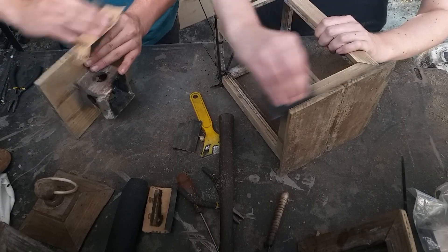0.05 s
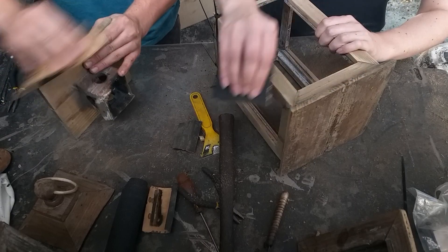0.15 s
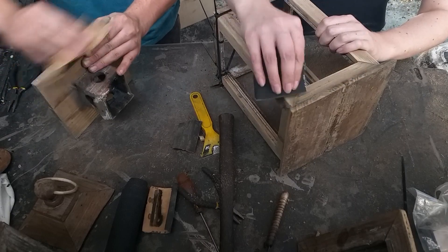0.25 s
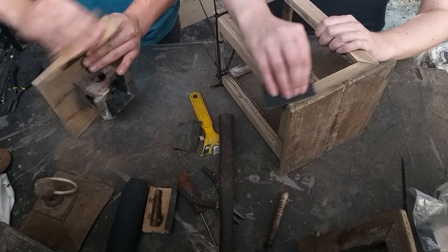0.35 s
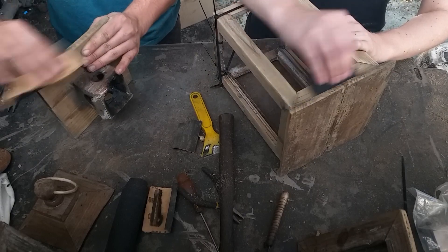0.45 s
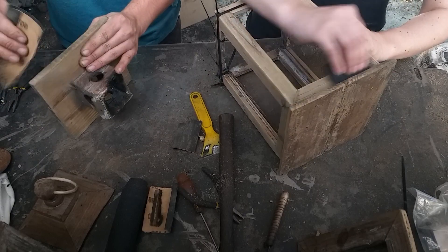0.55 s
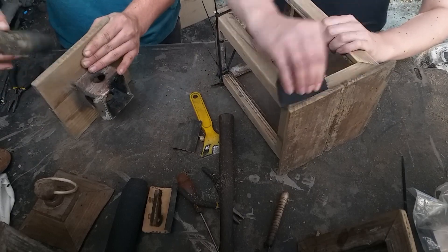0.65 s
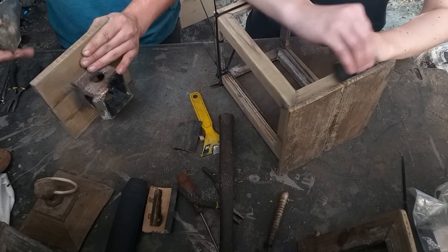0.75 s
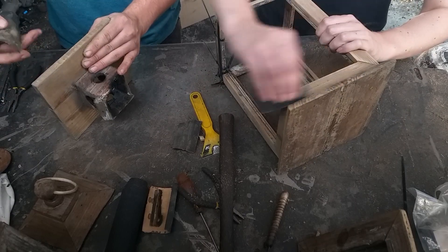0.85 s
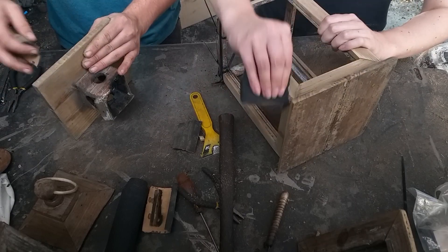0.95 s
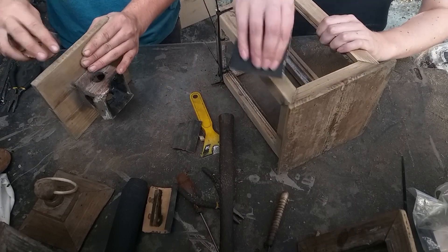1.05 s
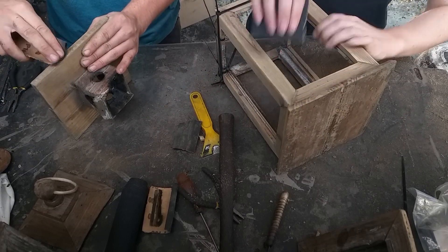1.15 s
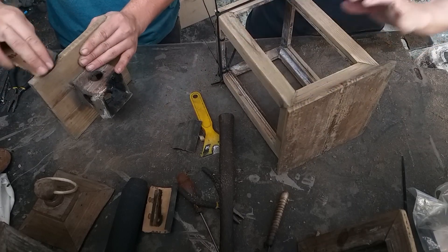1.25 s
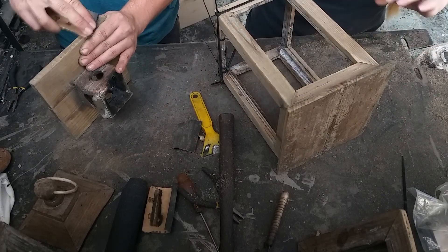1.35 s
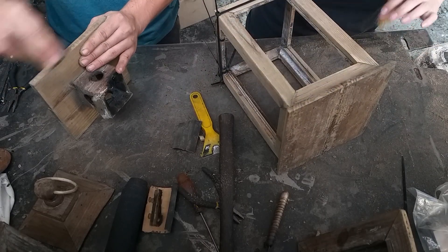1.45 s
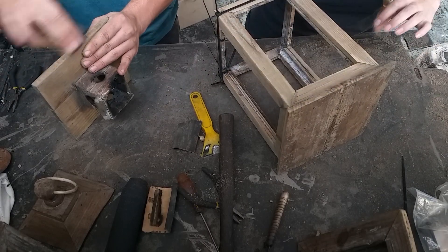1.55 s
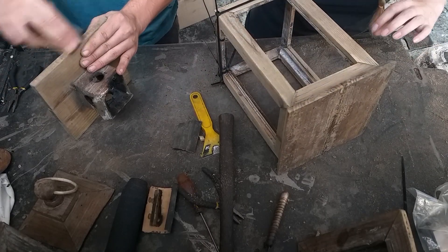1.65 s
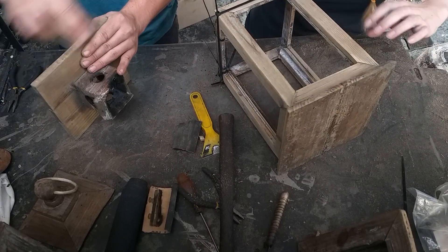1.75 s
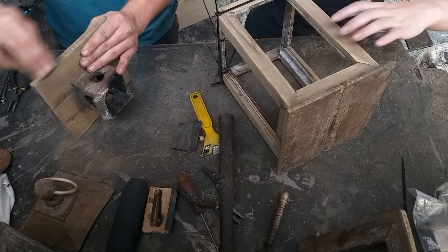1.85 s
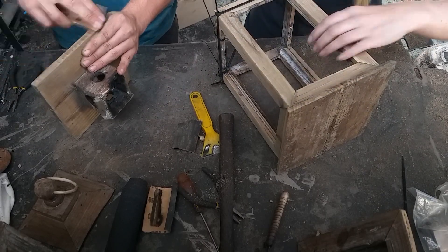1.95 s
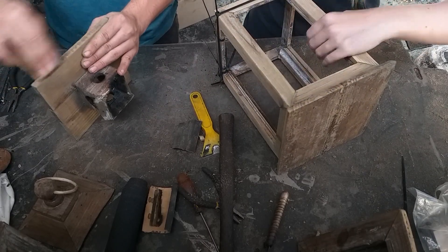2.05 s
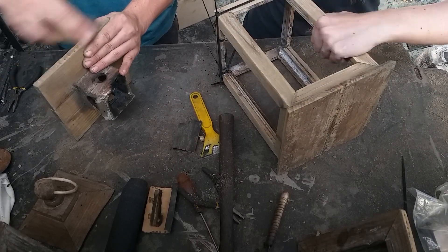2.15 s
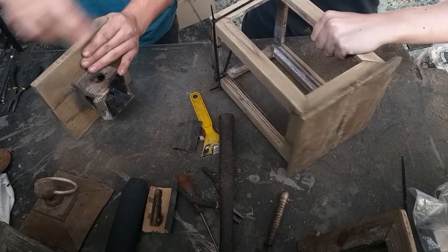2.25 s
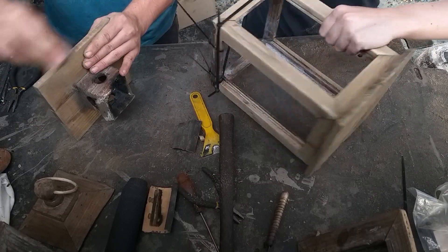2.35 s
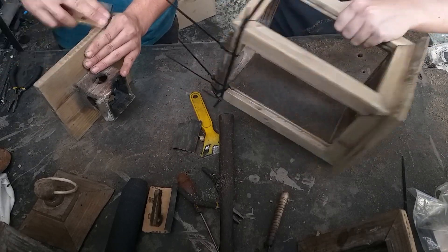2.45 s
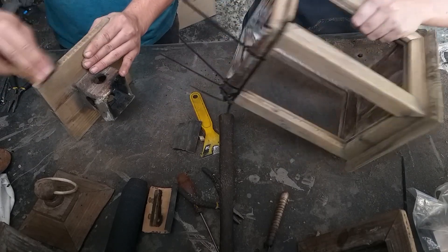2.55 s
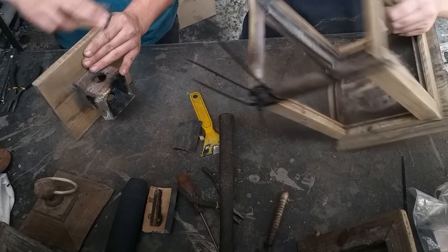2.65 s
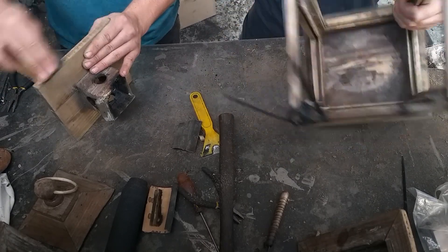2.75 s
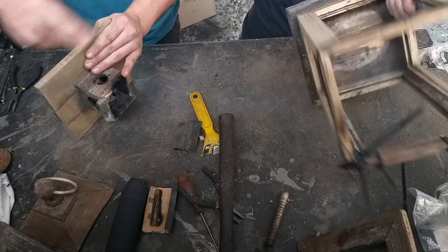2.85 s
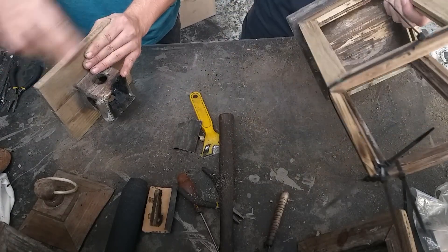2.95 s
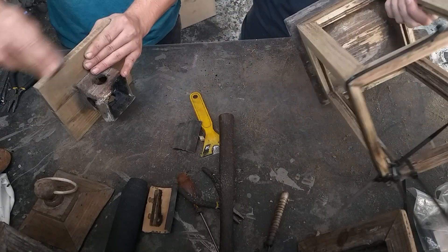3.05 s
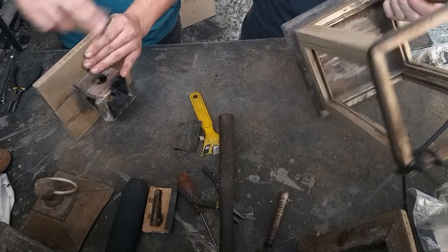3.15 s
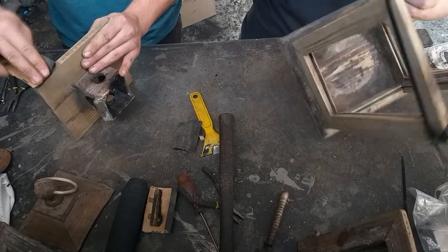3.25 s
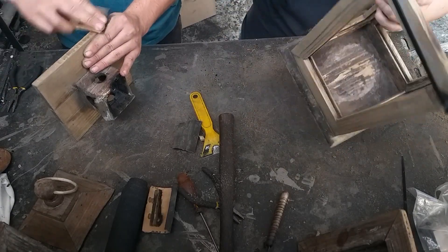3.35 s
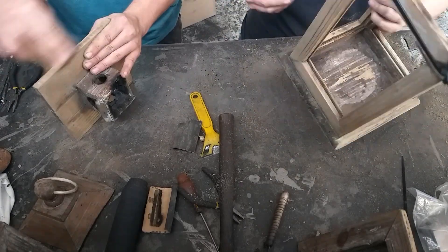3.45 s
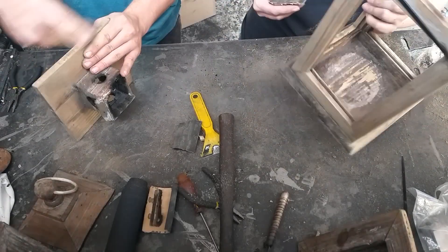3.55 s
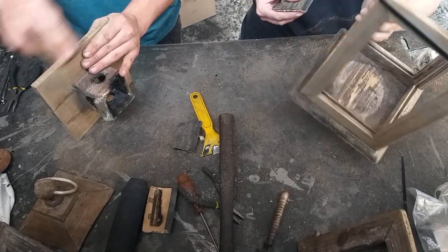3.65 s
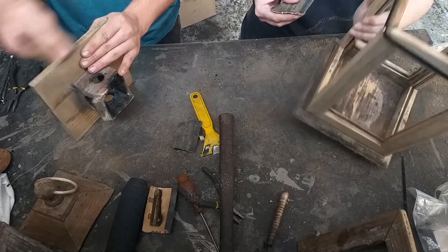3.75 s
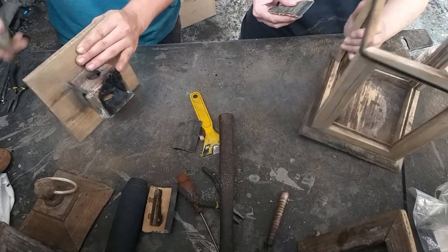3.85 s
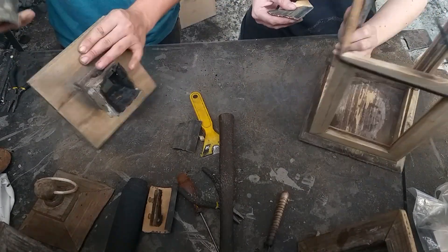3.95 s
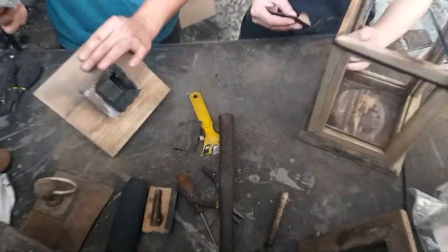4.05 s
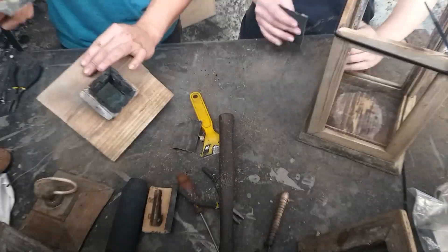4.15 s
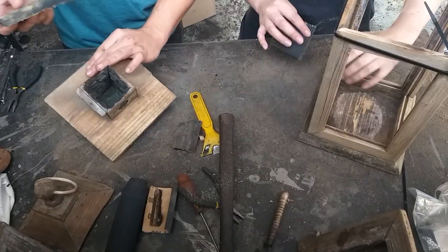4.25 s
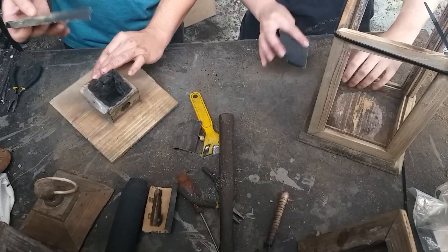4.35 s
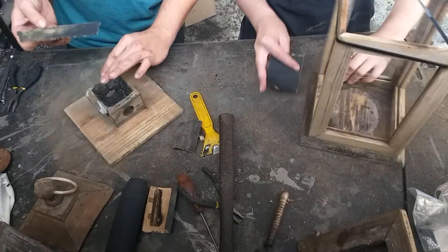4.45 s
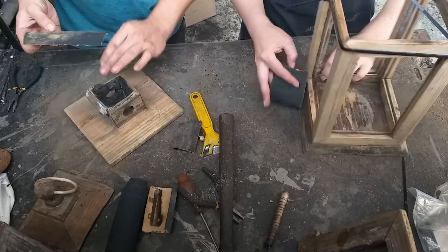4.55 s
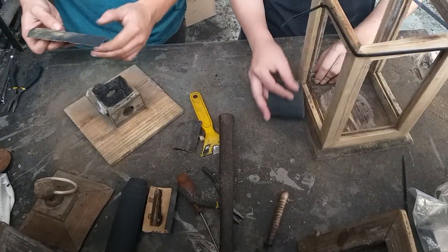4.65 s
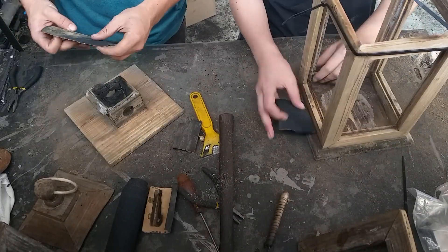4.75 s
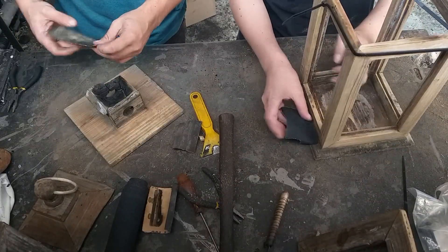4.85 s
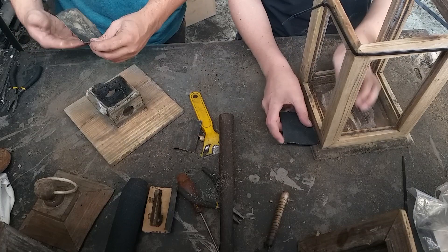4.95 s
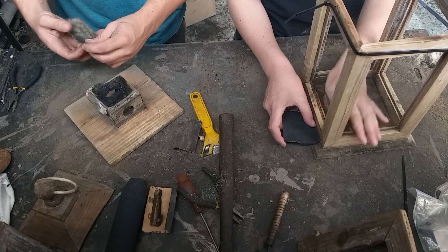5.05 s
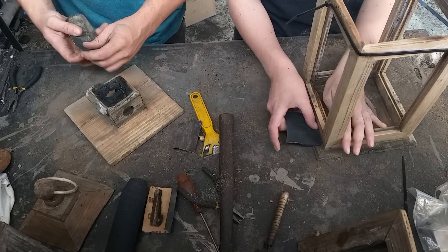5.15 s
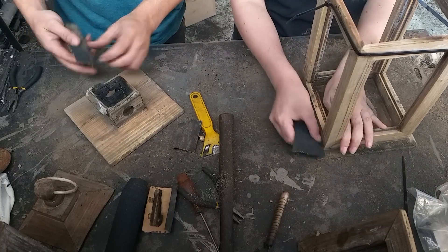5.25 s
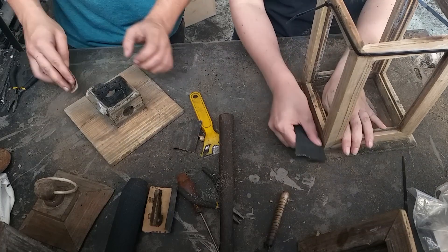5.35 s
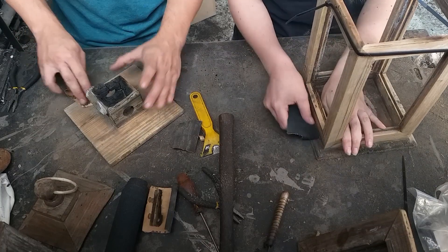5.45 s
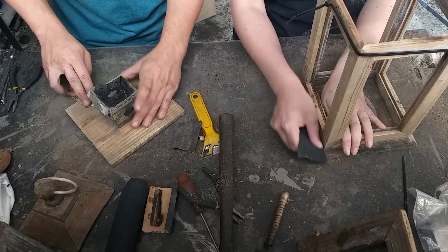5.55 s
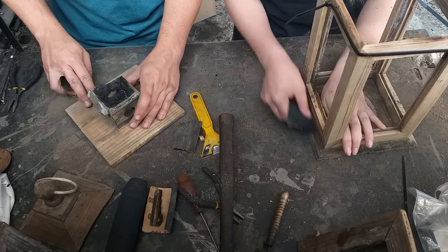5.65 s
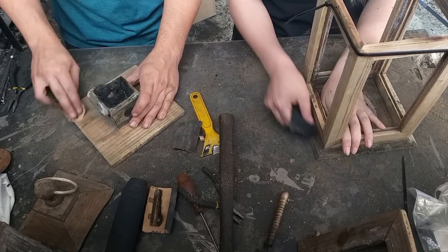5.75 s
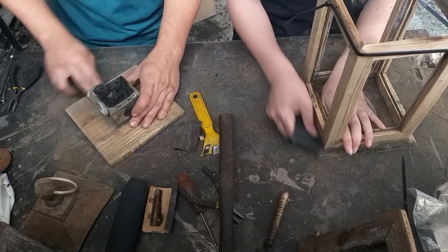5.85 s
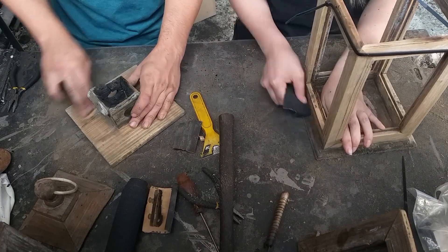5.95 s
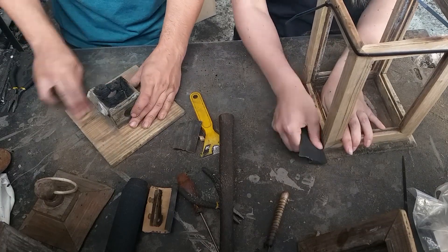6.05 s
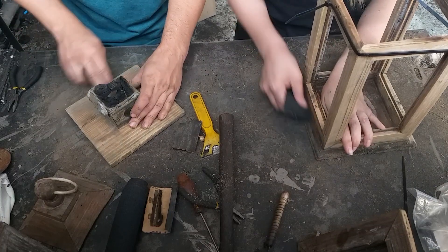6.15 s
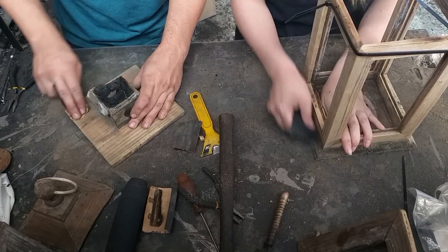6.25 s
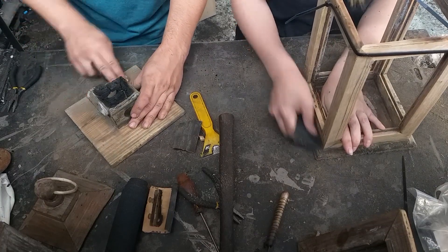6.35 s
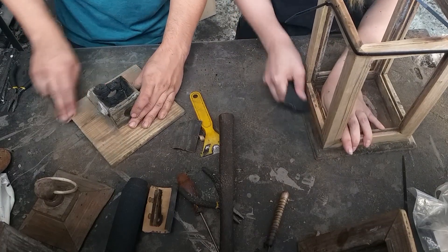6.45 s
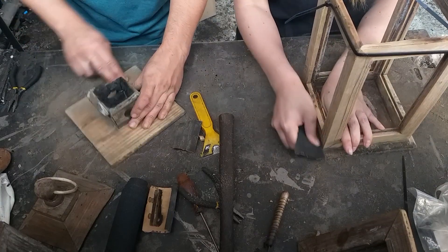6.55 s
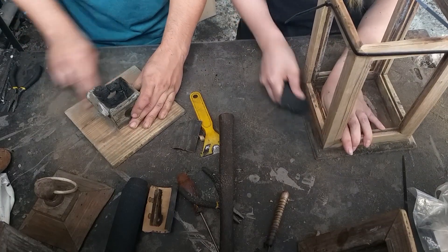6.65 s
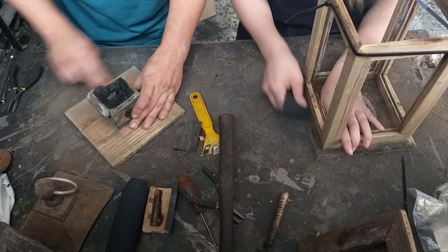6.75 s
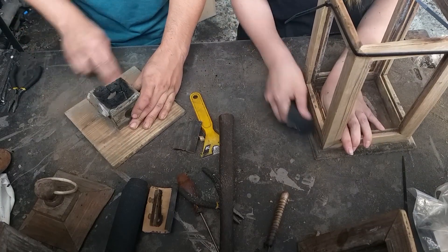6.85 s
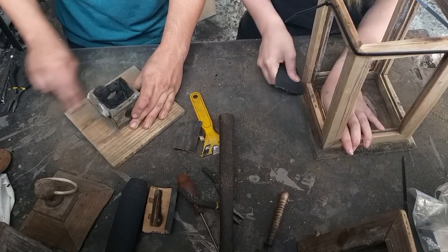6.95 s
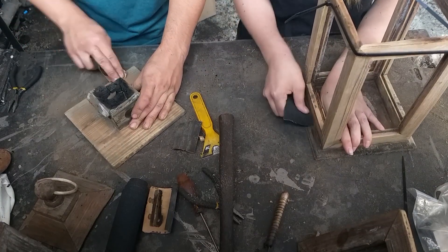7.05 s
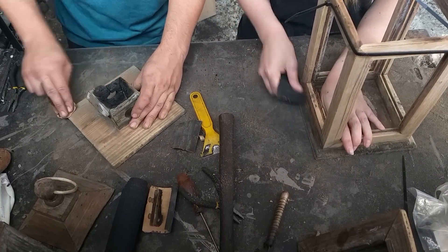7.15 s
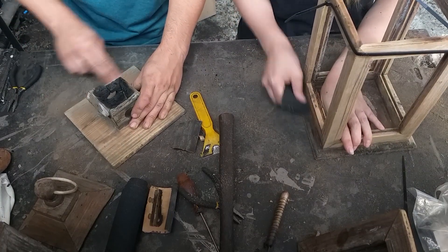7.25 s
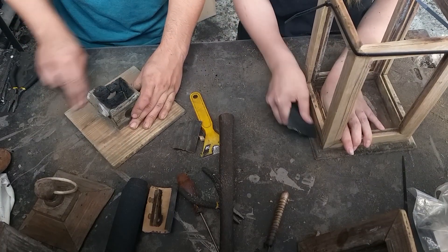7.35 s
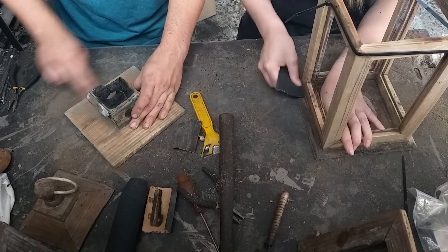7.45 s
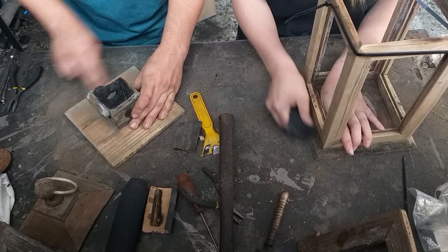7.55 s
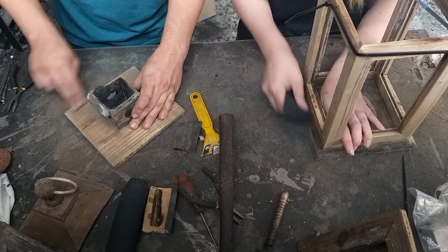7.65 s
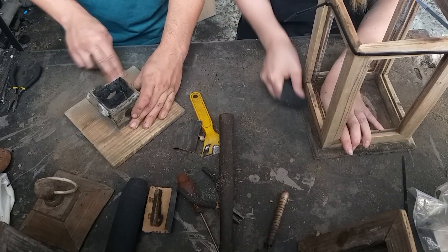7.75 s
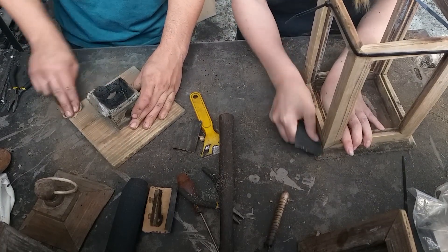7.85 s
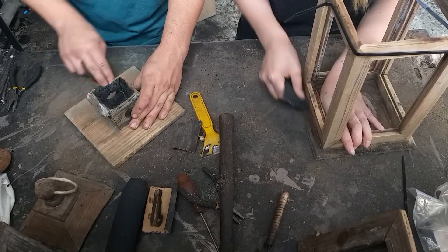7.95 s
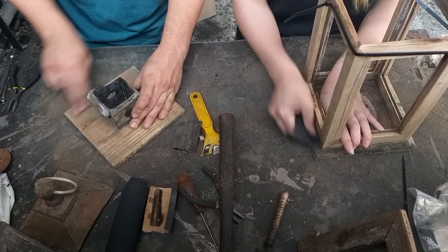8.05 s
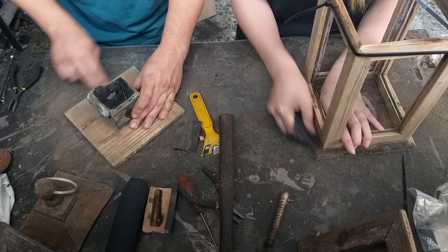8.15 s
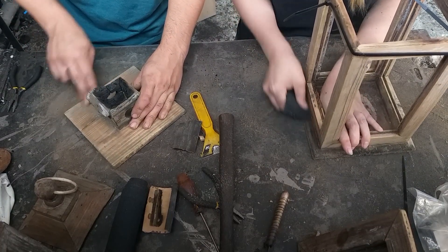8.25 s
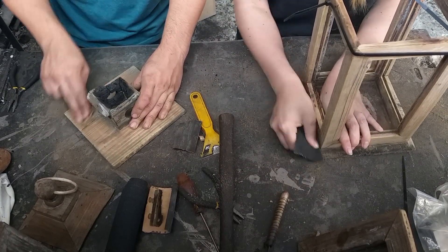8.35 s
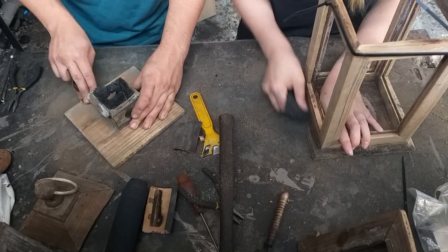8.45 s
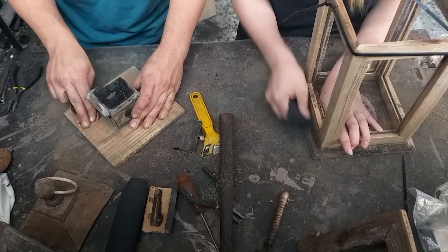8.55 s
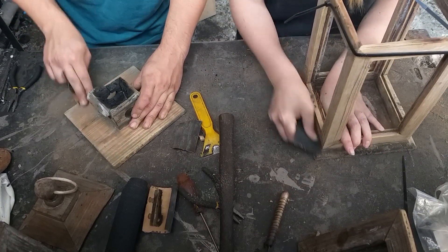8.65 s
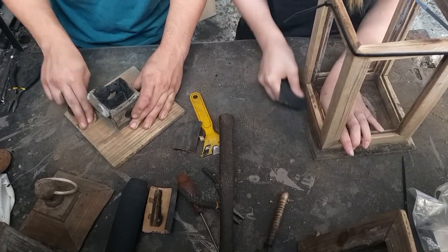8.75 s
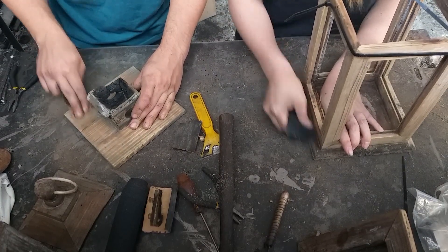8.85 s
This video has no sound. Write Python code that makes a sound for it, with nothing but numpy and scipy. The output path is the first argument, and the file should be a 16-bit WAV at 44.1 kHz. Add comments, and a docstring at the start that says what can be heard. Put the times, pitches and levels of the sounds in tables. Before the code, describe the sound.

Close, dry sandpaper scratching on wood: a few strong strokes, a brief faint lull, then steady lighter strokes at about eleven per second. Around four seconds the sanding stops; pieces rustle, tick and bump softly, and a wooden frame taps the bench sharply. Sanding returns, soon louder and rougher, with small hollow snags. Close microphone in a quiet workshop with a slight room tail and faint low murmur.

```python
"""Hand sanding at a workbench

Two people sand wood close to a microphone; in a pause a board is turned and laid down, and a frame taps the bench.
Grit is noise shaped in quick strokes, heard direct, through wood resonances and as a bench drone.
Snags, ticks, thuds and the tap are decaying modes and noise bursts; a diffuse tail and a low murmur
surround them."""
import sys
import numpy as np
from scipy import signal
from scipy.fft import rfft, irfft
from scipy.io import wavfile
from scipy.ndimage import uniform_filter1d

SR = 44100
rng = np.random.default_rng(int(sys.argv[2]) if len(sys.argv) > 2 else 0)


def inscribe(sig):
    """Save sig as 16-bit PCM at rate SR to the path in sys.argv[1].

    A 1-D sig is mono; a 2-D sig holds one channel per row.
    Samples are clipped to [-1, 1] before scaling.
    """
    pcm = np.round(np.clip(np.atleast_2d(sig).T, -1, 1) * 32767)
    wavfile.write(sys.argv[1], SR, pcm.astype(np.int16))


N = 392049
T = np.arange(N) / SR
HZ = np.arange(N // 2 + 1) * SR / N + 1  # bin frequencies, raised by 1 Hz to keep the logarithm finite


def undb(db):
    """Logarithmic level: decibels become an amplitude gain."""
    return 10 ** (np.asarray(db) / 20)


def shape(table):
    """Spectral envelope: (hz, db) points are joined along a logarithmic frequency axis, as a gain per bin."""
    hz, db = np.transpose(table)
    return undb(np.interp(np.log(HZ), np.log(hz), db))


def colour(x, gain):
    """Linear filtering: the spectrum is multiplied by a gain per bin, then scaled to rms 1."""
    y = irfft(rfft(x) * gain, N)
    return y / np.sqrt(np.mean(y ** 2))


def curve(table):
    """Piecewise-linear envelope: each column after start_s is drawn over time."""
    s, *columns = np.transpose(table)
    return [np.interp(T, s, column) for column in columns]


def walk(rate_hz):
    """Slow random modulation: levels held 1 / rate_hz seconds and smoothed twice; spread near 1."""
    hold = int(SR / rate_hz)
    steps = np.repeat(rng.standard_normal(N // hold + 1), hold)
    return 1.3 * uniform_filter1d(uniform_filter1d(steps, hold), hold)[:N]


def grit(spread_db):
    """Abrasion noise: paper grains cut fibres in dense random clicks, some larger than the rest."""
    size = np.minimum(rng.exponential(size=N), 5)
    return rng.standard_normal(N) * undb(spread_db * size)


def add_mode(out, start_s, level_db, hz, t60_s, push_s=0.00044):
    """Modal ringing: a short push excites one sinusoid, which decays by 60 dB in t60_s."""
    t = np.arange(int(.4 * SR)) / SR
    onset = 1 - np.exp(-t / push_s)
    ring = np.sin(2 * np.pi * hz * t) * onset * 1000. ** (-t / t60_s)
    i = int(start_s * SR)
    out[i:i + len(t)] += undb(level_db) * ring[:N - i]


def add_crack(out, start_s, peak_db, t60_s, lo_hz, hi_hz):
    """Impulsive excitation: a burst of band noise with a fast attack and exponential decay."""
    t = T[:4000]
    band = signal.butter(1, [lo_hz, hi_hz], "band", fs=SR, output="sos")
    burst = signal.sosfilt(band, rng.standard_normal(len(t)))
    burst = burst * np.minimum(t / .0006, 1) * 1000. ** (-t / t60_s)
    i = int(start_s * SR)
    out[i:i + len(t)] += undb(peak_db) * burst / np.abs(burst).max()


# spectrum of the low murmur of the surroundings: hz [Hz], relative_db [dB per Hz]
MURMUR = [(18, -32), (30, -3.5), (135, 4.5), (535, -10.5), (767, -19), (949, 2), (1190, -29), (1360, -18),
          (1500, -11), (1950, -36), (3300, -120)]


def murmur():
    """Stationary background noise: a fixed spectrum with a slowly wandering level."""
    level_db = -62.5 + 2.0 * walk(2.87)
    return undb(level_db) * colour(rng.standard_normal(N), shape(MURMUR))


# strokes, each lasting until the next turn or lift:
# start_s [s], turn_db [dB, scratch at the turn], early_db [dB], late_db [dB]
STROKES = [(0.0, -28, -21.5, -24), (0.068, -29.5, -21.5, -23.5), (0.164, -43, -24, -22.5),
           (0.242, -41, -24.5, -24.5), (0.332, -41, -27.5, -23), (0.419, -38.5, -21, -24.5),
           (0.51, -34, -38, -51), (0.564, -49, -34, -32.5), (0.682, -48, -30, -35),
           (0.776, -51, -31, -30.5), (0.921, -50, -43, -40), (0.964, -52.5, -42.5, -60),
           (1.097, -76, -59, -55.5), (1.199, -64, -54.5, -43.5), (1.296, -64, -39, -36),
           (1.418, -60, -39.5, -30), (1.53, -47, -34.5, -41.5), (1.651, -52, -38.5, -34),
           (1.745, -51, -32, -28.5), (1.837, -52, -31.5, -28.5), (1.927, -45, -32, -29.5),
           (2.011, -47.5, -31, -29), (2.096, -48, -33, -31.5), (2.171, -52, -35, -29),
           (2.258, -43, -31.5, -33), (2.344, -50, -30, -31.5), (2.43, -47, -31, -32),
           (2.521, -50, -33.5, -31.5), (2.611, -47, -33, -30.5), (2.696, -48.5, -29, -32.5),
           (2.784, -48, -31, -30.5), (2.869, -48.5, -28.5, -31), (2.962, -48, -31.5, -32.5),
           (3.043, -51, -31.5, -31), (3.13, -49, -32, -32.5), (3.216, -52, -32.5, -29),
           (3.306, -45, -32, -31.5), (3.391, -48.5, -33.5, -31.5), (3.477, -47, -33.5, -32),
           (3.561, -50, -34, -31), (3.657, -47, -35, -31), (3.749, -49.5, -31, -38),
           (5.373, -70, -38, -37.5), (5.492, -53, -38.5, -33), (5.616, -51, -32, -33.5),
           (5.743, -52, -31.5, -25.5), (5.874, -37, -29, -23.5), (5.96, -37.5, -30, -27.5),
           (6.046, -30.5, -26, -24.5), (6.121, -34, -27.5, -28), (6.229, -33, -28.5, -25.5),
           (6.38, -31, -23, -24), (6.481, -39, -25.5, -26.5), (6.588, -35, -26, -24),
           (6.655, -25.5, -24, -22), (6.749, -39.5, -23.5, -20.5), (6.845, -33, -26.5, -22),
           (7.009, -32, -25, -26), (7.111, -43, -26, -24.5), (7.194, -27.5, -29, -32),
           (7.267, -30.5, -25.5, -26), (7.368, -41.5, -28.5, -23.5), (7.467, -29.5, -28.5, -22.5),
           (7.639, -45, -27.5, -24), (7.728, -29.5, -30, -23), (7.895, -39, -28, -28),
           (7.996, -32.5, -28, -25), (8.068, -29.5, -24.5, -32), (8.151, -44, -28, -24),
           (8.252, -31.5, -30.5, -23.5), (8.416, -38.5, -24, -28.5), (8.51, -33.5, -29.5, -24.5),
           (8.588, -33.5, -28, -29.5), (8.68, -41, -28.5, -28), (8.785, -35, -28.5, -30),
           (8.852, -33, -34, -25)]
# the paper leaves the wood: start_s [s], turn_db [dB, last scratch]
LIFTS = [(3.854, -60), (8.93, -34)]
# balance against the scratch: start_s [s], wood_db [dB], drone_db [dB], fine_db [dB, finest hiss before offsets]
BALANCE = [(0, -10, -19, -4.5), (.45, -12.5, -14.5, -6), (.6, -3.5, -14, -5), (.72, -3.5, -7, -6),
           (.85, -11, -16.5, -4), (.98, -4, -6.5, -5), (1.14, -8, -21, -8), (1.25, -2, -0.5, -8),
           (1.35, -6, -15.5, -1.5), (1.6, -3.5, -7, -7.5), (1.8, -8, -17.5, -3), (2.3, -7, -15, -2.5),
           (2.55, -7, -18.5, -4.5), (3, -8.5, -18.5, -4), (3.4, -6, -14.5, -3), (3.8, -6, -19, -4.5),
           (5.42, -4.5, -13, -8), (5.68, -6, -21, -7), (5.9, -11, -19.5, -3.5), (6.3, -9.5, -21, -4.5),
           (6.45, -4.5, -16, -5), (6.6, -9, -22, -2.5), (6.7, -5.5, -19.5, -6), (6.8, -10, -20.5, -3),
           (6.95, -5, -19.5, -6.5), (7.07, -9, -18, -5), (7.16, -4, -21.5, -5), (7.28, -9, -21.5, -2.5),
           (7.4, -6.5, -22, -5.5), (8, -11, -22.5, -3.5), (8.4, -9, -18.5, -2.5), (8.89, -8, -19.5, -3)]
# getting going and slowing down: a base time (s) plus a share of the stroke's length
START_S, START_SHARE, STOP_S, STOP_SHARE = 0.0066, 0.067, 0.0038, .11
LONGEST_S = 0.22  # a stroke counts for no more than this in the ramps
WOOD_FOLLOW = 0.76  # share of a stroke's swell, in dB, that the wood ring follows


def strokes(ramp=0.8, arch=0.18):
    """Reciprocating friction: the paper stalls at each turn and is fastest in between.
    Returns gains of scratch, wood ring, bench drone and finest hiss."""
    lifts = [(s, db, -120, -120) for s, db in LIFTS]
    s, turn_db, early_db, late_db = np.transpose(sorted(list(STROKES) + lifts))
    k = np.clip(np.searchsorted(s, T, "right") - 1, 0, len(s) - 2)
    since, until = T - s[k], s[k + 1] - T
    place = since / (since + until)
    length = np.minimum(since + until, LONGEST_S)
    start = START_S + START_SHARE * length
    stop = STOP_S + STOP_SHARE * length
    going = np.clip(.5 + ramp * (since / start - 1), 0, 1)
    slowing = np.clip(.5 + ramp * (until / stop - 1), 0, 1)
    moving = going * slowing
    speed = moving * np.abs(np.sin(np.pi * place)) ** arch
    # within the stroke the level slides from early to late
    swell_db = (np.clip(place * 2.03 - .6, 0, 1) - .5) * (late_db[k] - early_db[k])
    travel = speed * undb((early_db[k] + late_db[k]) / 2 + swell_db)
    turning = undb(np.interp(T, s, turn_db)) * (1 - moving)
    wood_db, drone_db, fine_db = curve(BALANCE)
    wood_db = wood_db - (1 - WOOD_FOLLOW) * swell_db
    fine_db = fine_db + 4.6 * (speed - .8)  # faster is brighter
    return (travel + turning) * undb([0 * T, wood_db, drone_db, fine_db])


def hand_gains():
    """Mechanical inertia: stroke and handling gains add in energy; the heavy bench follows most slowly."""
    gains = np.hypot(strokes(), handling())
    windows = (90, 130, 1300, 90)  # samples
    return [uniform_filter1d(gain, size=n) for gain, n in zip(gains, windows)]


# the hands move to another surface: start_s [s]
CHANGES = (1.1, 3.855, 5.37, 8.25)
SURFACE = np.searchsorted(CHANGES, T)
# scratch spectra on frame, edge and face of the wood, and of paper held loose:
# hz [Hz], relative_db [dB per Hz]
ON_FRAME = [(1760, -39), (3000, -7.5), (3380, -4), (3880, -9), (6050, -4), (6960, -1.5), (9580, -6),
            (10400, -9.5), (14400, -8.5), (15800, -15)]
ON_EDGE = [(1760, -40), (3000, -5), (3700, -8), (4580, -5), (5020, -7), (6580, -1), (9450, -2),
           (10300, -10), (12800, -4), (15800, -11)]
IN_HAND = [(1800, -45), (3000, -12), (3400, -4.5), (4050, -14), (4500, -5.5), (5400, -7.5), (7200, -1.5),
           (9500, -7.5), (15800, -17)]
ON_FACE = [(1760, -42), (3000, -4), (4910, -4), (5810, -4), (6720, 0.5), (7830, 0.5), (9510, -0.5),
           (10600, -4), (12100, 0), (15800, -8.5)]
# centres of the overlapping parts of the hiss: hz [Hz]
PATCHES = (3300, 4400, 5800, 7200, 8800, 11000, 13000, 15000)
SPLIT_HZ = 10000  # parts centred from here up follow the finest-hiss gain


def paper_hiss(scratch, fine):
    """Broadband friction radiation: the paper flexes, so each part of the hiss swells alone."""
    grains = grit(2.5)
    tables = (ON_FRAME, ON_EDGE, IN_HAND, ON_FACE, ON_FACE)
    hiss = rfft(np.choose(SURFACE, [colour(grains, shape(table)) for table in tables]))
    out = np.zeros(N)
    for k, hz in enumerate(PATCHES):
        weight = np.interp(HZ, PATCHES, np.arange(len(PATCHES)) == k)
        part = irfft(hiss * weight, N)
        gain = scratch if hz < SPLIT_HZ else fine * undb(4.5)
        out += part * undb(1.78 * walk(35)) * gain
    return out


# resonances of the sanded wood: hz [Hz], width_hz [Hz], relative_db [dB]
WOOD_MODES = [(1134, 200, -12), (1650, 170, -4), (1820, 177, -0.5), (2330, 140, -8.5), (2520, 180, -1.5),
              (2724, 146, -4)]


def wood_ring():
    """Resonant filtering: grit noise drives separate wood modes over a broad resonant band."""
    modes = np.zeros(N)
    for hz, width_hz, db in WOOD_MODES:
        resonance = 1 / (1 + 1j * (HZ - hz ** 2 / HZ) / width_hz) ** 2
        modes += undb(db + 3.35 * walk(30)) * colour(grit(5.2), resonance)
    band = [(1100, -34), (1400, -4.5), (2000, 4.0), (3000, -3.0), (3500, -25)]  # Hz, dB per Hz
    broad = colour(grit(1.8), shape(band))
    return undb(-7.5) * modes + undb(-3.5) * broad


# bench spectrum under each surface in turn: hz [Hz], relative_db [dB per Hz]
DRONES = [
    [(35, -48), (60, -20), (129, -9.5), (204, -11.5), (539, -6.5), (725, -7.5), (1160, -0.5), (1500, 0.5),
     (1950, -23), (3300, -120)],
    [(35, -39), (60, -17), (124, -10), (327, -12), (525, -2.5), (818, -5), (1130, -1), (1500, -2),
     (1950, -38), (3300, -120)],
    [(120, -32), (200, -1), (243, -10), (269, -6), (532, -11), (574, -7.5), (984, 3.5), (1500, 2),
     (1950, -31), (3300, -120)],
    [(35, -52), (60, -21), (107, -19), (279, -23.5), (446, -18.5), (696, -7.5), (807, -6), (1500, -3),
     (1950, -41), (3300, -120)],
    [(35, -46), (60, -17), (174, -7.5), (268, -16.5), (385, -5.5), (617, -11.5), (924, 0), (1500, -6),
     (1950, -34), (3300, -120)],
]


def bench_drone():
    """Structure-borne sound: the bench passes the low part of the grit noise, with a wavering level."""
    grains = grit(3.9)
    drone = np.choose(SURFACE, [colour(grains, shape(table)) for table in DRONES])
    return drone * undb(4.25 * walk(25))


def sanding():
    """Parallel transmission paths: grit is heard direct, through the wood and through the bench."""
    scratch, ring, drone, fine = hand_gains()
    grip = undb(0.88 * walk(45) + 1.36 * walk(220))  # the paper grips unevenly
    return grip * (paper_hiss(scratch, fine) + ring * wood_ring()) + drone * bench_drone()


def room(x, t60_s=0.68, wet_db=-22):
    """Diffuse reverberation: bench and shed walls return a decaying noise tail, duller than the direct sound."""
    t = np.arange(SR // 2) / SR
    tail = rng.standard_normal(len(t)) * 1000. ** (-t / t60_s) * (t > .004)
    tail = signal.sosfilt(signal.butter(1, 3000, fs=SR, output="sos"), tail)
    tail = tail / np.sqrt(np.sum(tail ** 2))
    return x + undb(wet_db) * signal.fftconvolve(x, tail)[:N]


# dry ticks of the paper: start_s [s], peak_db [dB]
TICKS = [(0.1, -11), (0.218, -14), (3.9928, -34), (4.036, -29), (4.0638, -23.5), (4.0955, -29),
         (4.1905, -36), (4.5037, -22), (4.6545, -25.5), (4.8861, -28), (4.891, -25.5), (4.978, -23.5),
         (5.1211, -32), (5.207, -28.5), (5.29, -18.5), (5.3048, -23), (5.34, -19.5), (5.3954, -14),
         (5.6002, -33), (5.6762, -20), (5.9681, -18), (6.11, -14), (6.705, -15), (8.377, -16),
         (8.383, -6.5), (8.3922, -10)]


def ticks(out):
    """Impulsive release: each tick of the paper is a very short burst of high band noise."""
    for s, db in TICKS:
        add_crack(out, s, db, 0.01, 3500, 15000)


# wood bumps the bench top: start_s [s], level_db [dB, before the mode levels]
THUDS = [(0.44, -43), (0.693, -34.5), (2.245, -34.5), (3.859, -45), (3.934, -46), (4.02, -32.5),
         (4.067, -30.5), (4.168, -26.5), (4.204, -37), (4.478, -27), (5.088, -45), (8.374, -45)]
# modes of the bench top: hz [Hz], relative_db [dB], decay_share [share of the thud's t60]
BENCH_MODES = [(113.4, -9.5, 1.0), (125, -9.5, 0.89), (162, -1, 0.74), (223.6, -11.5, 0.86),
               (300, -9.5, 0.54), (430, -14, 0.42), (954, -26, .6)]
THUD_T60_S = 0.15


def thuds(out):
    """Impact on a plate: a soft blow excites the low bench modes beneath a burst of contact noise."""
    for s, db in THUDS:
        for hz, mode_db, share in BENCH_MODES:
            corner_s = 0.00576 * rng.random()  # the piece lands on one corner after another
            add_mode(out, s + corner_s, db + mode_db, hz, share * THUD_T60_S, push_s=0.0036)
        add_crack(out, s, db - 5, 0.091, 250, 1600)


# the paper snags and the wood rings out: start_s [s], level_db [dB, before offsets], pitch_hz [Hz]
SNAGS = [(0.446, -22, 2320), (0.672, -26, 2240), (0.701, -32, 2270), (0.816, -30, 1250), (3.863, -34, 950),
         (4.033, -34, 956), (4.056, -33, 920), (4.061, -27.5, 910), (4.096, -33, 2040), (4.165, -41, 1710),
         (4.421, -40, 1630), (4.978, -27, 1980), (5.159, -40.5, 1870), (5.221, -34.5, 980),
         (5.258, -25, 885), (5.421, -28, 1940), (6.216, -21, 1770), (6.306, -20, 2520), (6.396, -9.5, 2430),
         (6.433, -17, 2110), (6.448, -11.5, 1820), (6.655, -12, 2330), (6.661, -13, 2280),
         (6.667, -13, 2600), (6.706, -11, 1820), (6.717, -15, 1690), (6.906, -16.5, 2440),
         (6.933, -13, 1850), (6.958, -22, 1730), (7.027, -25, 1680), (7.148, -18, 1670), (7.173, -18, 1710),
         (7.42, -16.5, 2570), (7.427, -18, 2660), (7.796, -23.5, 1750)]
SNAG_T60_S = .02


def snags(out):
    """Stick-slip excitation: a snag of the paper rings one wood mode, with band noise around its pitch."""
    for s, db, hz in SNAGS:
        add_mode(out, s, db + 4.5, hz, SNAG_T60_S, push_s=0.0014)
        add_crack(out, s, db - 5.0, SNAG_T60_S, hz / 1.07, hz * 1.34)


# light rubbing and rustling while the pieces are turned:
# start_s [s], scratch_db [dB], wood_db [dB against scratch], drone_db [dB against scratch]
HANDLING = [(3.84, -55, -4, -7), (3.9, -58, -10, -7), (3.965, -63, -11, -13), (3.995, -50, -13, -20),
            (4.018, -60, -7, -6), (4.06, -45.5, 1.5, 4), (4.1, -49, -12, -15), (4.135, -54, -8, -5),
            (4.17, -52, -3, 0), (4.24, -53, -18, -27), (4.31, -59, -10, -27), (4.36, -54, -6, -21),
            (4.41, -59, -5, -19), (4.43, -48.5, -4, -16), (4.49, -46, 1, 0), (4.57, -48, -2, 0.5),
            (4.66, -46.5, 1, 0), (4.715, -53, -1, -4), (4.78, -48.5, -7, -7.5), (4.83, -55, -3, -6),
            (4.91, -48.5, -4, -8), (4.955, -58, -1, -15), (5.02, -53, -3, -10), (5.085, -57, -4, -8),
            (5.12, -51, -3, -10), (5.165, -56, -14, -15), (5.19, -47.5, -10, -17), (5.3, -43.5, -1, -3),
            (5.333, -50, -1, -13), (5.345, -44, 3, -17), (5.385, -46, -5, -15)]


def handling():
    """Light-contact friction: the same four gains as the strokes, drawn for the rubbing in the pause."""
    scratch_db, wood_db, drone_db = curve(HANDLING)
    inside = (T > HANDLING[0][0]) & (T < HANDLING[-1][0])
    fine_db = 0 * T - 2.5  # before the offset in paper_hiss
    return inside * undb(scratch_db + np.array([0 * T, wood_db, drone_db, fine_db]))


# blow and bounces of the frame: start_s [s], level_db [dB, before offsets]
TAPS = [(4.4800, -13), (4.4835, -18.5), (4.4917, -23.5), (4.501, -31), (4.514, -38)]
# modes of the wooden frame: hz [Hz], relative_db [dB], t60_s [s, before a 0.98 scaling]
FRAME_MODES = [(246, -5.5, .03), (418, -7, 0.073), (556, -20, .05), (673, -5.5, .06), (780, -4, .04),
               (914, -8, 0.071), (993, -3.5, 0.048), (1195, -9, .04), (1354, -9, 0.037), (1450, -7, .03),
               (1660, -8, 0.032), (1943, -9, .025), (2210, 4, 0.021), (2600, -17, .03), (2770, -13, 0.018),
               (3030, -7, 0.027), (4300, -16, 0.023)]


def frame_tap(out):
    """Modal impact: the frame's modes ring at the blow and at each weaker bounce, with contact noise."""
    for s, db in TAPS:
        for hz, mode_db, t60_s in FRAME_MODES:
            delay_s = .0012 * rng.random()
            add_mode(out, s + delay_s, db + mode_db - 1.5, hz, 0.98 * t60_s, push_s=0.00068)
        add_crack(out, s - .0015, db - 8.5, 0.015, 1500, 9000)
        add_crack(out, s, db - 4, 0.15, 240, 1400)  # the many close modes of the joints


def knocks():
    """Superposition: the separate impacts add linearly."""
    out = np.zeros(N)
    for source in (ticks, thuds, snags, frame_tap):
        source(out)
    return out


def scene():
    """Common sound field: sanding and knocks with their tail, plus murmur, arrive alike at both ports."""
    near = room(sanding() + knocks())
    return np.tile(near + murmur(), (2, 1))


# side signal against mid: hz [Hz], side_db [dB, before its wavering]
PORTS = [(1100, -80), (1500, -16.5), (2500, -21), (3000, -80), (8000, -64), (9000, -14.5), (10500, -14.5),
         (11400, -75)]
# phase of the side signal: hz [Hz], phase_rad [rad]
PORT_PHASE = [(2000, 2.5), (9000, 0.96)]
TOP_HZ = 15900


def record(dry):
    """Mid-side stereo: the two ports differ in two bands by a wavering amount; a low-pass cuts the top."""
    hz, phase_rad = np.transpose(PORT_PHASE)
    rotation = np.exp(1j * np.interp(HZ, hz, phase_rad))
    side = irfft(rfft(dry[0]) * shape(PORTS) * rotation, N) * undb(2.0 * walk(15))
    ports = dry + np.array([side, -side])
    return signal.sosfilt(signal.ellip(10, .2, 70, TOP_HZ, fs=SR, output="sos"), ports)


dry = scene()
out = record(dry)
inscribe(out)
```